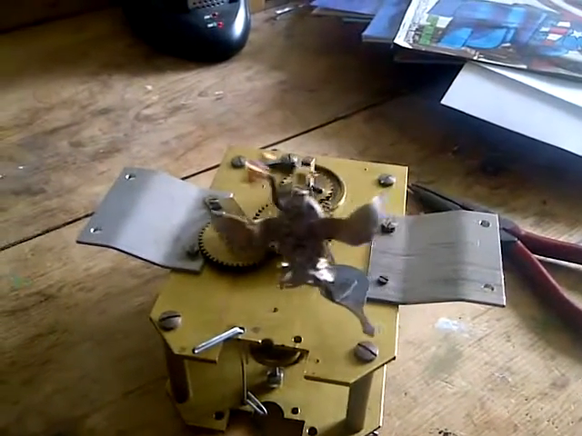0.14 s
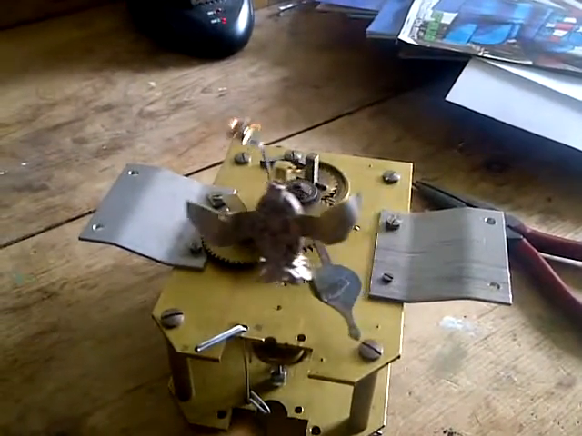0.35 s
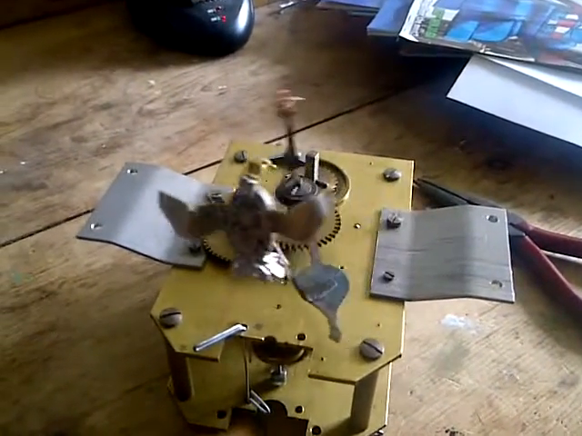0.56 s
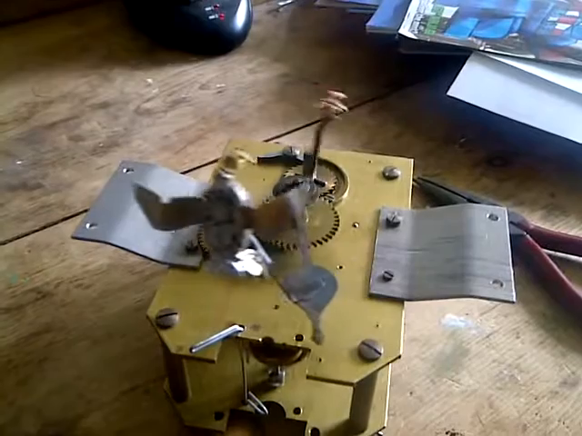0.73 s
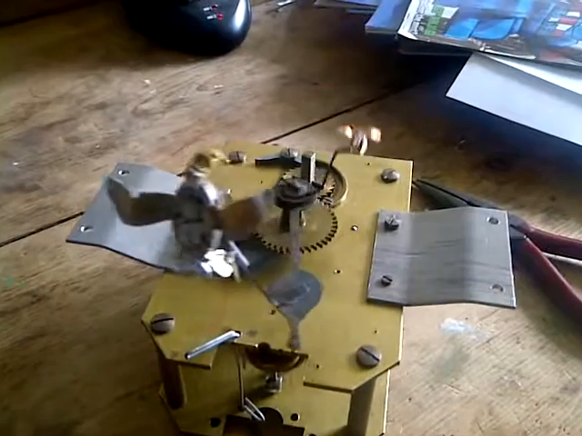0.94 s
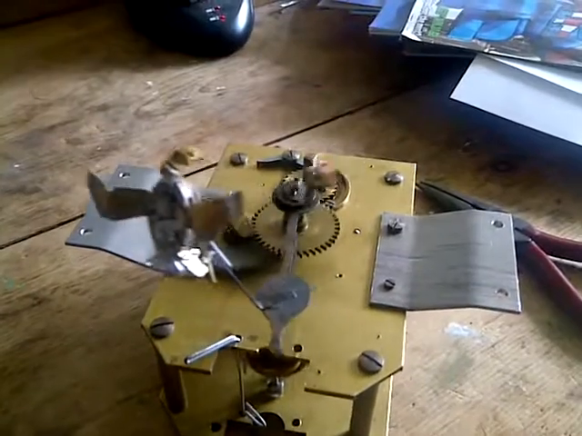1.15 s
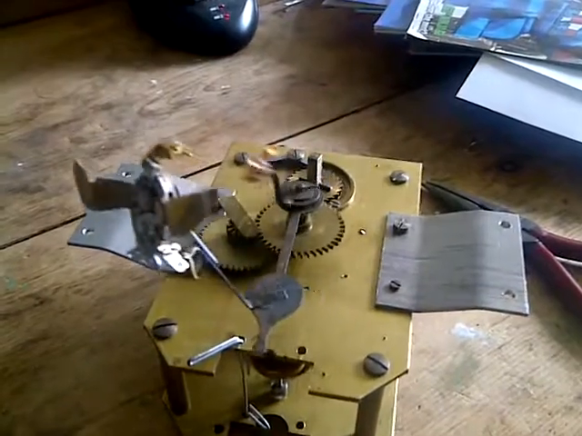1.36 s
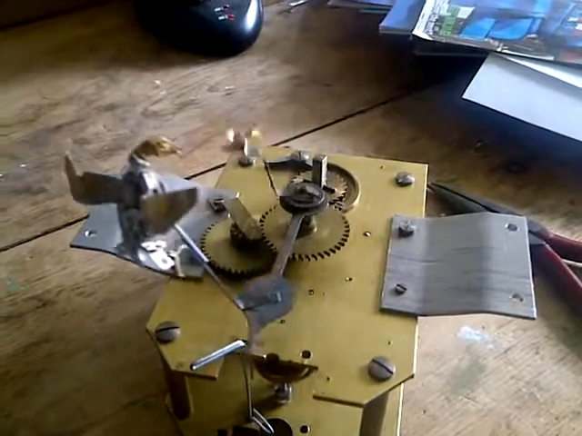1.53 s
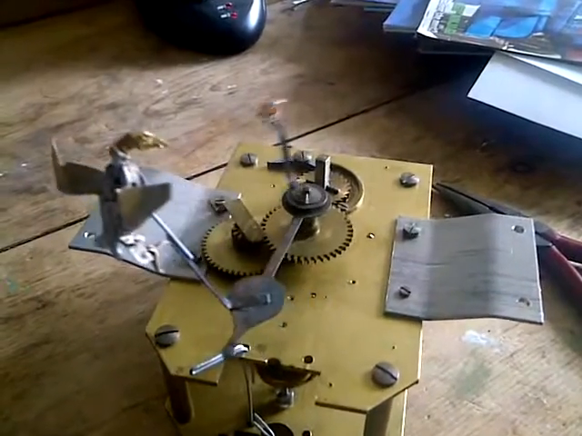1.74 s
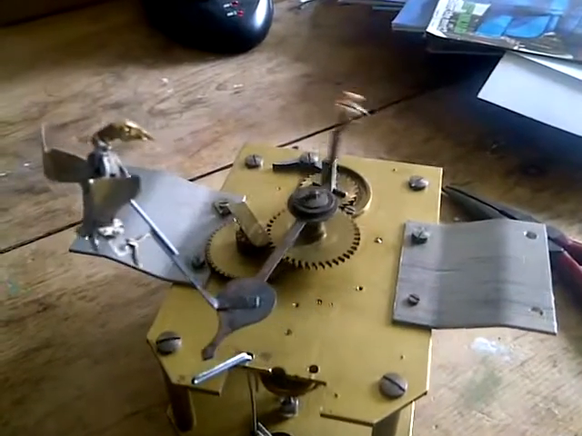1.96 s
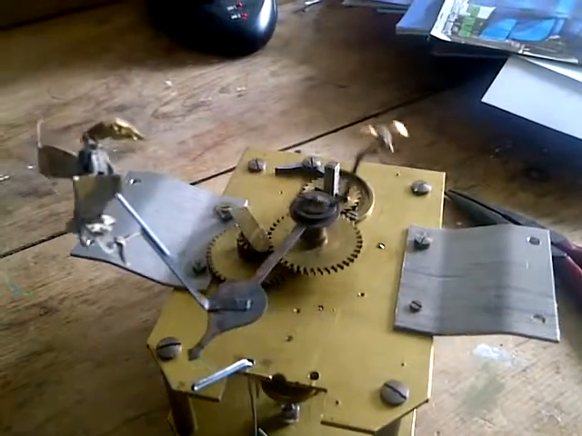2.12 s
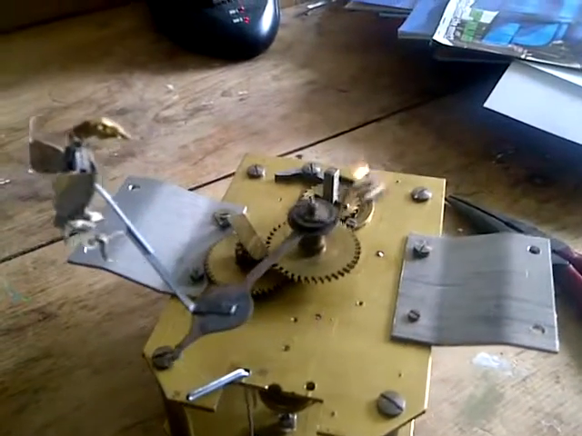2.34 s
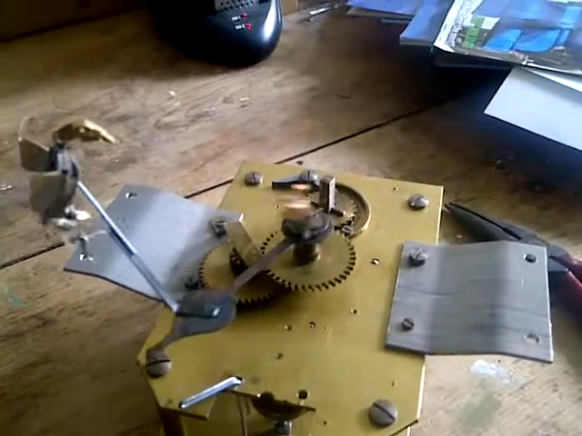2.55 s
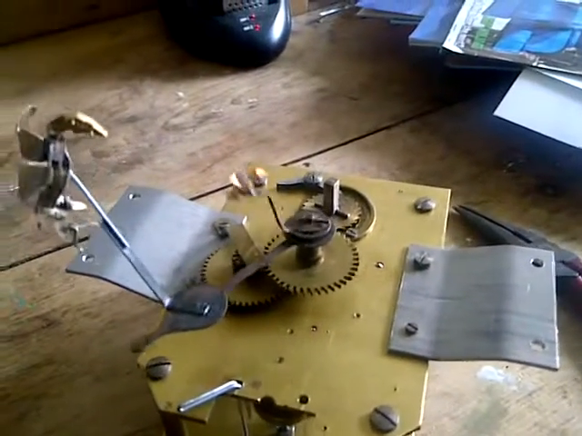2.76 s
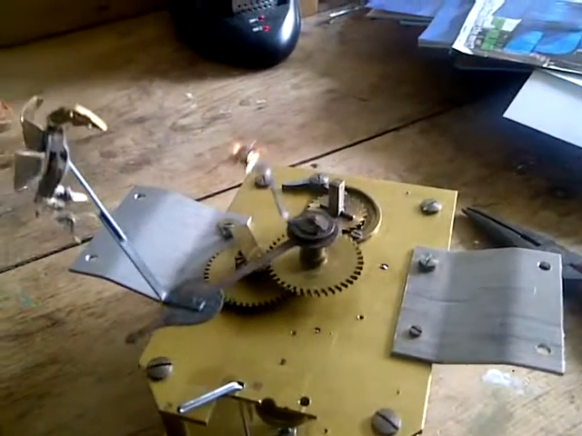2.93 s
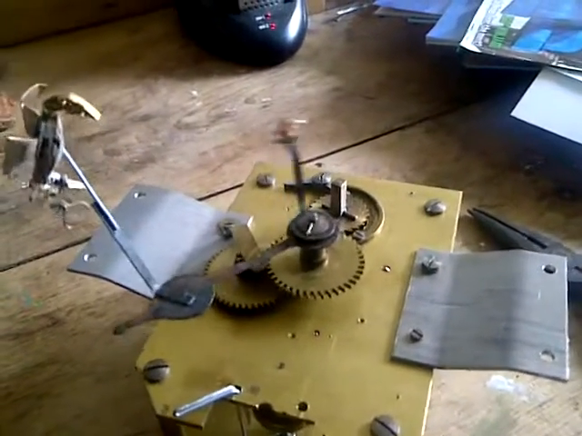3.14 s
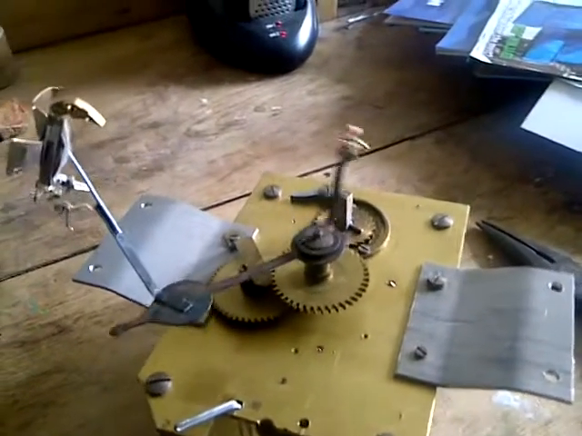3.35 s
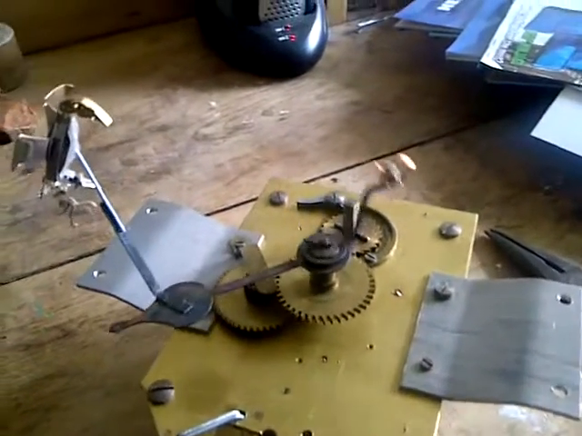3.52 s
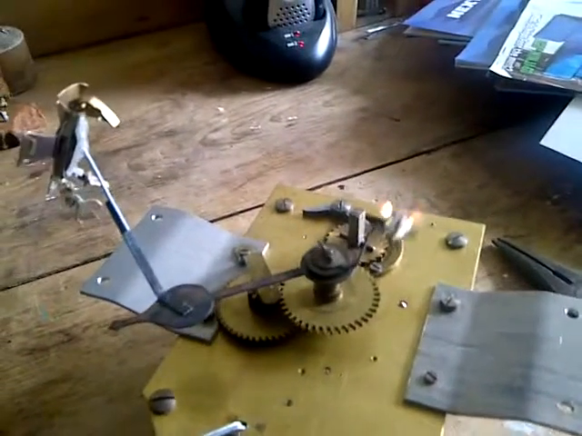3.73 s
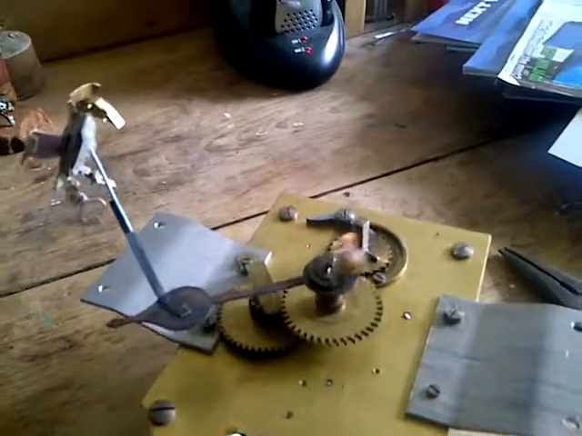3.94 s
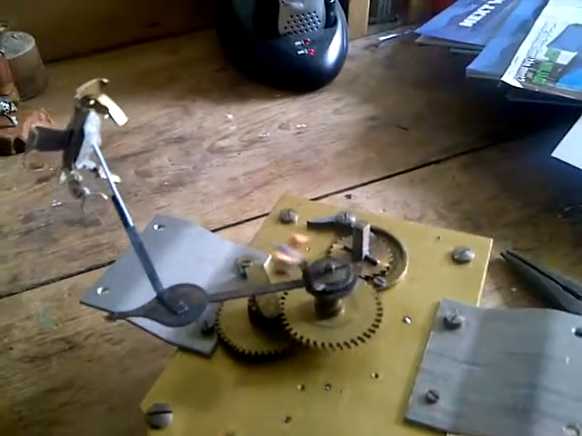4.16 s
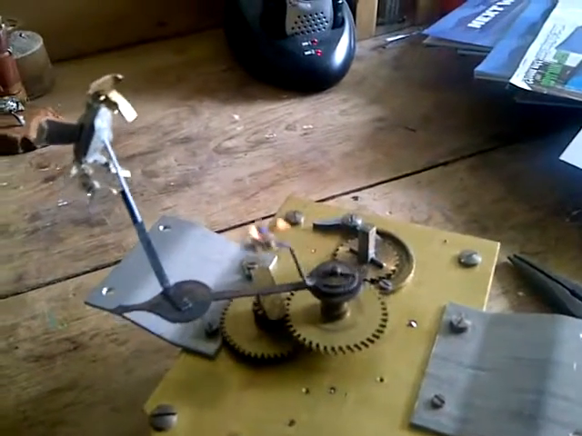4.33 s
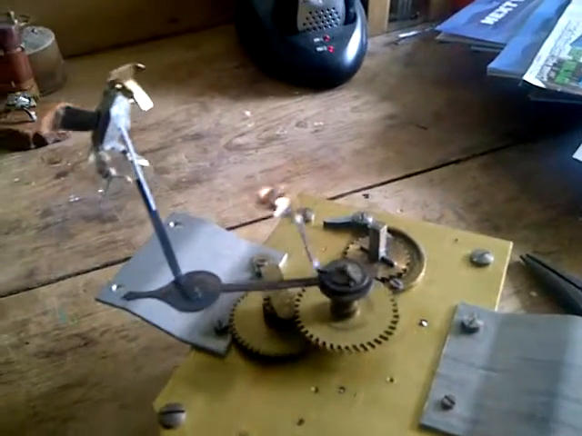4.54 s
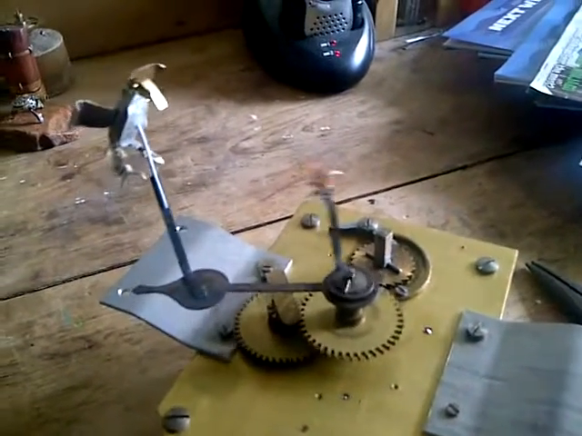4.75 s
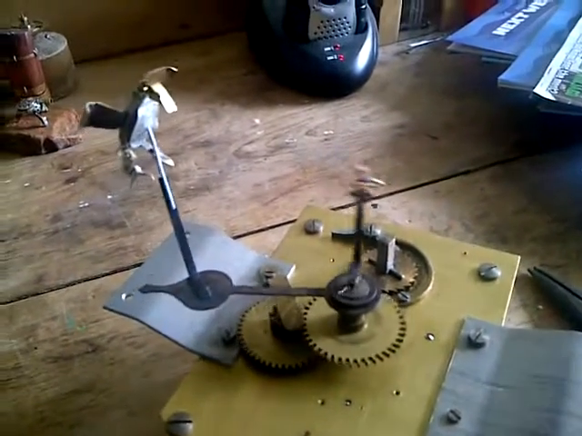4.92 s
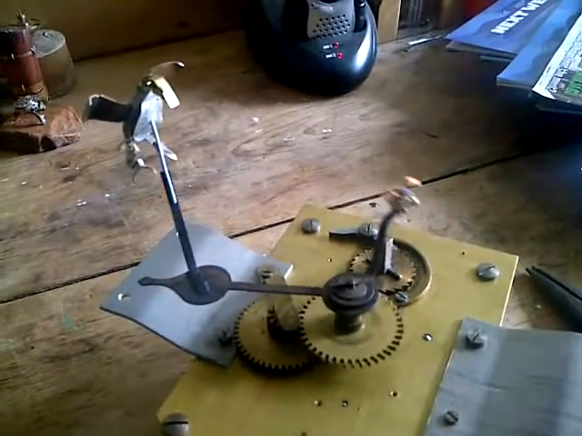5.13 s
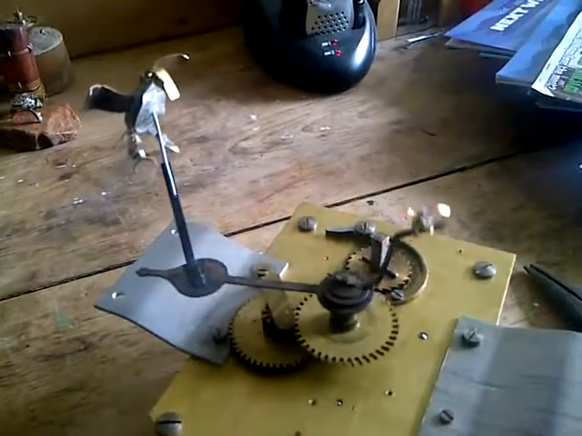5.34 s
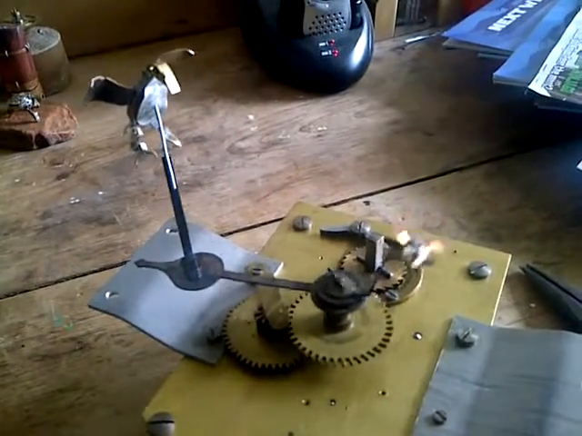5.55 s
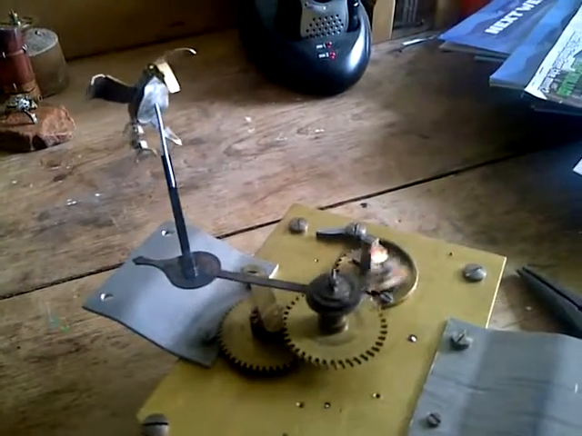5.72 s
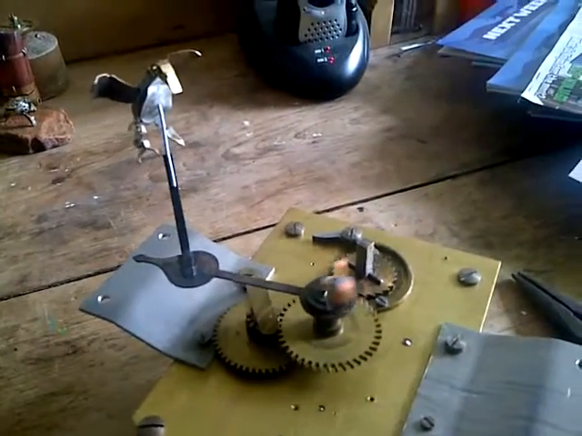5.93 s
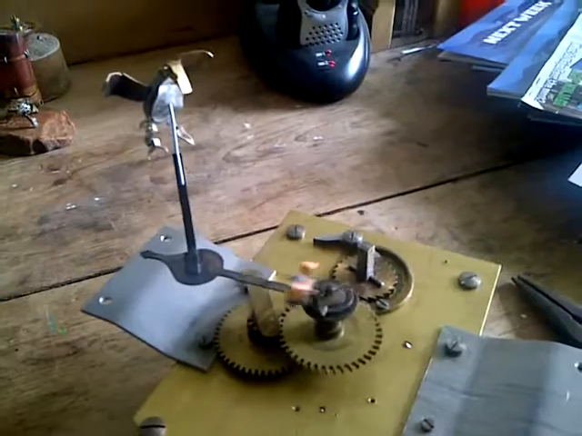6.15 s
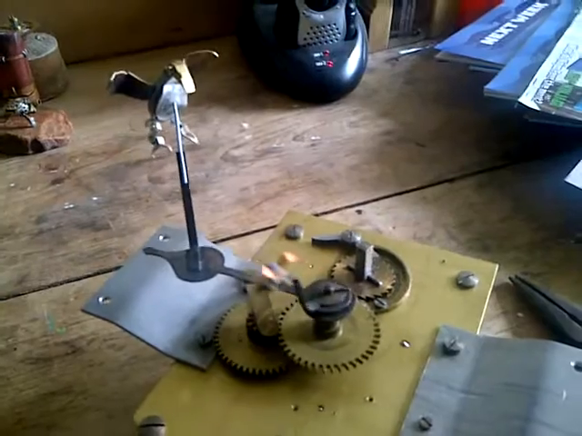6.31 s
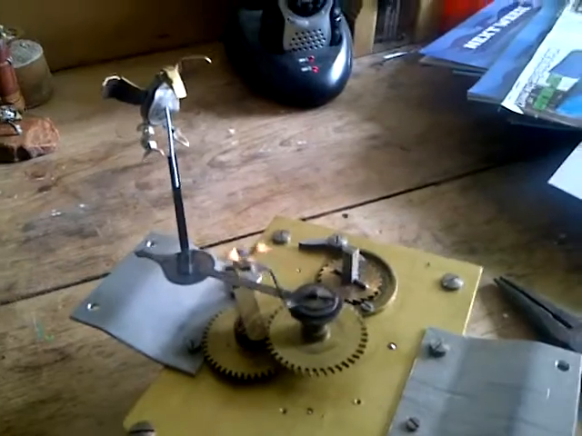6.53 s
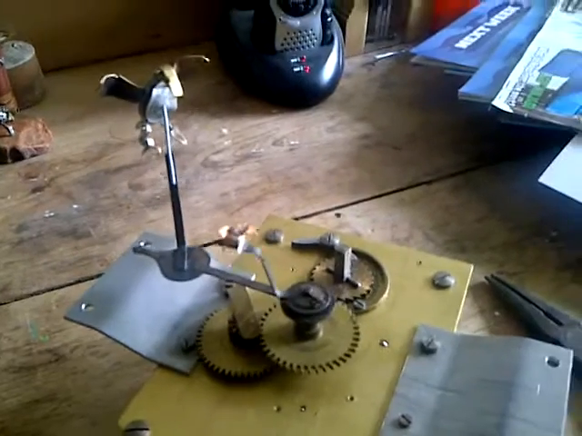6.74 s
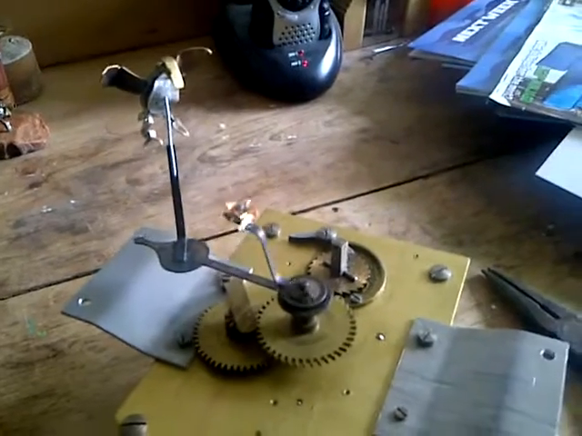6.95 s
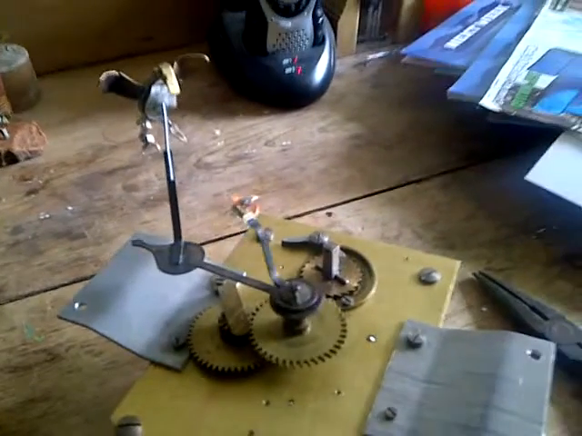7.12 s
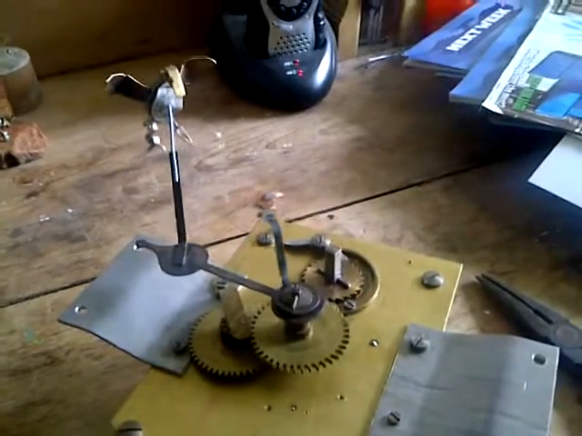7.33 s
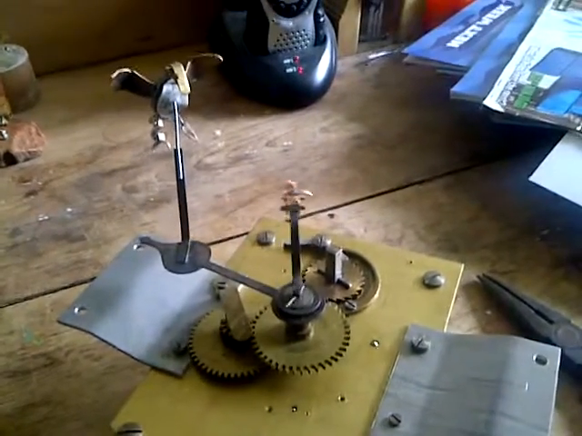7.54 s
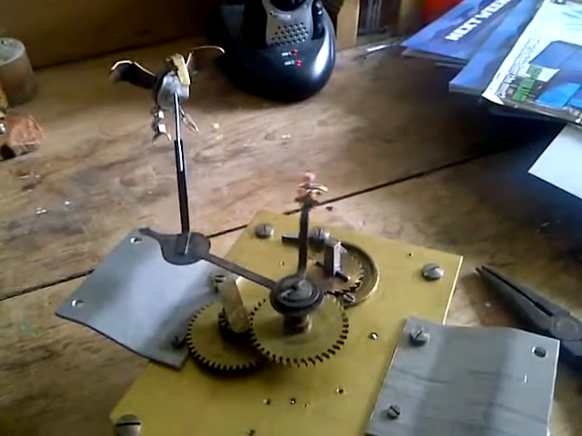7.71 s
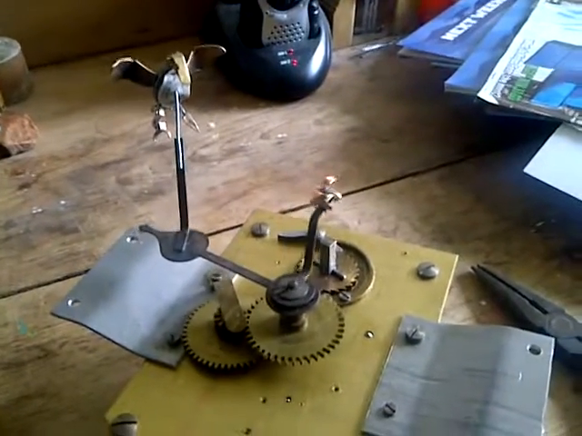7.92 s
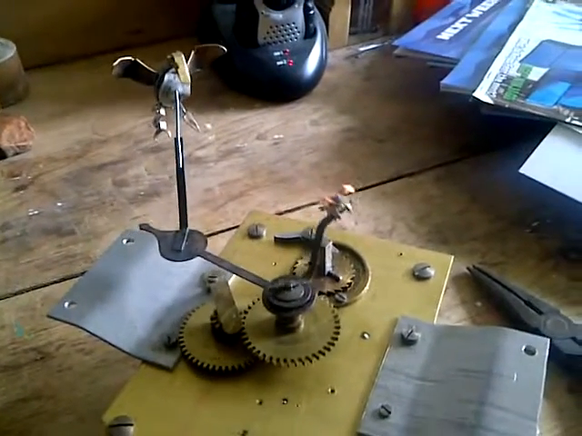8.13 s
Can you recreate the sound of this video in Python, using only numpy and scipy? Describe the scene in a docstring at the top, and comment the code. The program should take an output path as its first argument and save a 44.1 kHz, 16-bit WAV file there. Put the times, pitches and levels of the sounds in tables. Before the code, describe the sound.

A spring-driven brass clock movement runs down on a wooden bench, close to the microphone in a small, quiet room. It begins as a fast, bright whir with a tinny rattle and brief low boom. A loose arm chatters and knocks irregularly while a slack wheel pings. Gradually the rattling thins, the pitch of the whir sinks, and it opens into a quieter ratcheting buzz still running at the end.

```python
"""A spring-driven brass clock movement runs down on a wooden bench, close to the microphone in a small room.
It starts as a whir, with a tin bird rattling brightly on a loose wire arm and a brief boom of the bench top.
Tooth blows drive the scrape, pinion and frame; the arm chatters and knocks, and a slack wheel pings.
Midway a soft rasp swells and fades, with two faint bumps of handling in the middle of it.
As the fastest arbor slows from about 52 to 14 turns a second, the whir opens into a ratcheting buzz."""
import sys
import numpy as np
from scipy import signal
from scipy.fft import rfft, irfft, next_fast_len
from scipy.io import wavfile
from scipy.ndimage import uniform_filter1d, map_coordinates

SR = 44100
rng = np.random.default_rng(int(sys.argv[2]) if len(sys.argv) > 2 else 0)


def to_wav(sig):
    """Store sig (one row per channel, or 1-D mono) as 16-bit WAV at the path in sys.argv[1].

    Samples outside -1..1 are clipped; the rate is SR.
    """
    pcm = np.clip(np.atleast_2d(sig), -1, 1) * 32767
    pcm = np.round(pcm).astype(np.int16)
    wavfile.write(sys.argv[1], SR, pcm.T)  # frames by channels


N = 365148

# spectrum of the room tone: (frequency [Hz], relative density [dB per Hz])
ROOM_TONE_SPECTRUM = [(20, -9.5), (50, -8), (100, 1.5), (160, 2.5), (300, -8), (1000, -1), (8000, -21)]
# decay of the bench top and near walls: (frequency [Hz], 60 dB decay time [s])
ROOM_DECAY = [(200, 0.029), (2000, 0.14), (8000, 0.061)]
# soft bumps of handling: (time [s], peak level [dB])
HANDLING_BUMPS = [(4.149, -53), (4.236, -62)]
# resonances that color the bumps: (frequency [Hz], width [Hz], relative level [dB])
BUMP_MODES = [(69.4, 83, -7), (142, 94, -3)]
# drag of the turning parts, one soft rub: (start [s], length [s], peak level [dB])
SOFT_RUB = (2.94, 2.23, -60)
# resonances that color the rub: (frequency [Hz], width [Hz], relative level [dB])
RUB_MODES = [(1790, 220, -1.3), (1900, 260, -0.7)]
# speed of the fastest arbor: (time [s], speed [turns/s])
ARBOR_SPEED = [(0, 52.5), (.8, 50), (2, 45.5), (3.5, 39.3), (5, 30.5), (5.6, 26.3), (6.5, 20.8), (7, 17.5),
               (7.3, 16.1), (7.6, 15.2), (8.28, 14.35)]
# clear pings of the slack wheel: (time [s], peak level [dB])
WHEEL_PINGS = [(.108, -36), (.145, -40.5), (.386, -38), (.589, -38), (.626, -42), (.697, -43), (1.138, -46),
               (1.161, -47), (1.203, -39.5), (1.561, -39.5), (1.584, -41), (1.798, -39), (2.102, -40),
               (2.167, -38.5), (2.284, -40), (2.317, -39), (2.418, -40), (2.497, -39), (2.624, -33.5),
               (2.656, -47), (2.682, -36), (2.764, -41), (2.783, -46), (3.001, -40), (3.169, -43),
               (3.481, -38), (3.633, -40), (3.658, -39), (3.739, -52), (3.955, -38), (3.979, -40),
               (4.065, -40), (4.170, -39.5), (4.273, -39), (4.286, -43), (4.294, -45), (4.435, -39.5),
               (4.476, -40), (4.524, -41), (4.721, -54), (4.737, -39), (4.770, -43), (4.936, -43),
               (4.964, -44.5), (5.026, -41), (5.057, -42), (5.445, -43), (5.466, -48), (5.739, -45),
               (5.781, -45), (5.893, -43), (6.057, -43), (6.187, -45), (6.416, -46), (6.854, -50),
               (7.177, -46), (7.230, -51)]
# hard knocks of the arm: (time [s], peak level [dB])
ARM_KNOCKS = [(.036, -49), (.457, -32), (.505, -30.5), (.626, -29), (.688, -33), (.928, -33.5), (.988, -34),
              (1.042, -32), (1.162, -30), (1.196, -30.5), (1.604, -33), (1.799, -28.5), (1.985, -28.5),
              (1.993, -29.5), (2.292, -36), (2.315, -35), (2.328, -34), (2.488, -42), (2.659, -32),
              (2.697, -30), (3.005, -36), (3.146, -40), (3.210, -42), (3.381, -33), (3.431, -36),
              (3.737, -33), (3.778, -30.5), (3.829, -42), (4.039, -43), (4.065, -45), (4.264, -38),
              (4.273, -40), (4.289, -37), (4.498, -37), (4.523, -33), (4.709, -29), (4.719, -38),
              (4.737, -34), (4.859, -49), (4.913, -43), (5.026, -39), (5.095, -38), (5.197, -38.5),
              (5.367, -37), (5.438, -36), (5.454, -36), (5.466, -35), (5.651, -47), (5.739, -39),
              (5.775, -38), (5.893, -40), (6.102, -43), (6.366, -41), (6.395, -40), (6.753, -40),
              (6.854, -39), (6.963, -42), (7.018, -46), (7.193, -41), (7.252, -44), (7.439, -42),
              (7.551, -47), (7.617, -42), (7.674, -41), (8.019, -41), (8.217, -41)]
# bouts in which the loose parts shake harder: (start [s], length [s], rise [dB])
CHATTER_BOUTS = [(0.052, 0.12, 3.5), (0.432, 0.04, 0.5), (0.544, 0.095, 1), (0.671, 0.032, 6.5),
                 (0.92, 0.15, 2), (1.086, 0.1, 4), (1.247, 0.2, 2.5), (1.54, 0.12, 2), (1.91, 0.11, 3),
                 (2.27, 0.08, 5.5), (2.584, 0.14, 5), (2.746, 0.057, 8.5), (2.902, 0.13, 4),
                 (3.16, 0.089, 2), (3.353, 0.047, 6.5), (3.597, 0.1, 3), (3.727, 0.047, 9.5),
                 (3.794, 0.07, 9), (3.913, 0.1, 4), (4.018, 0.081, 6.5), (4.253, 0.058, 8),
                 (4.45, 0.15, 5.5), (4.696, 0.095, 1.5), (4.96, 0.11, 3), (5.44, 0.042, 7), (5.67, 0.2, 4),
                 (5.86, 0.045, 0), (6.31, 0.1, 4.5), (7.116, 0.2, 4.5), (7.565, 0.18, 2.5)]
# lulls in which they settle: (start [s], length [s], depth [dB])
CHATTER_LULLS = [(0.756, 0.037, 7), (1.255, 0.033, 6), (1.498, 0.061, 5), (1.724, 0.036, 7.5),
                 (2.47, 0.19, 4), (3.376, 0.088, 4.5), (5.245, 0.071, 7), (5.4, 0.053, 2),
                 (7.797, 0.29, 4.5)]
# rattle of the tin bird before bouts and lulls: (time [s], level [dB])
TIN_RATTLE = [(0, -53.5), (0.65, -54), (0.9, -63), (2, -83)]
# loose parts before trims, bouts and lulls: (time [s], arm chatter [dB], wheel ring [dB])
LOOSE_LEVELS = [(0, -45.5, -54.5), (0.85, -48, -52.5), (2.1, -44.5, -54.5), (2.7, -49, -50.5),
                (3.1, -48, -53), (4.1, -55, -57), (4.9, -54.5, -59), (5.55, -65, -63), (6.4, -60.5, -62.5),
                (7.65, -67.5, -62), (8.28, -63, -63.5)]
# how the arm goes from bouncing to riding on the teeth: (speed [turns/s], share of bouncing [0 to 1])
BOUNCE_SHARE = [(16.8, .08), (19, .6), (27, .72), (33, .92)]
# resonances of slack wheel, wire arm and tin bird: (frequency [Hz], width [Hz], relative level [dB])
WHEEL_MODES = [(2138, 42, -3.5), (2186, 50, 0), (2248, 62, -3), (2320, 90, -13), (2392, 35, -11)]
ARM_MODES = [(3980, 280, -6.5), (4130, 140, -3.5), (4198, 90, 0), (4300, 150, -1.5), (4420, 170, -4),
             (4530, 170, -8), (5700, 500, -20)]
TIN_MODES = [(2670, 140, -3), (4770, 320, -5.5), (5200, 330, -3.5), (5500, 360, -2), (5960, 320, -3.5),
             (6020, 91, -2.5)]
# force of the train before trims and load: (time [s], frame hum [dB], pinion ring [dB], tooth scrape [dB])
TRAIN_LEVELS = [(0.05, -51.5, -49.5, -50.5), (0.09, -53, -51.5, -53), (0.59, -51.5, -49.5, -51.5),
                (0.75, -53.5, -52, -52.5), (2.16, -54, -51, -52), (4.54, -58, -54, -58.5),
                (6.99, -62, -54.5, -61.5), (7.24, -62, -53, -59.5), (7.52, -63, -54.5, -60.5),
                (7.61, -60, -52, -59), (7.97, -63.5, -60, -59.5), (8.2, -59, -55, -59)]
# resonances of frame and pinion, fast and slow: (frequency [Hz], width [Hz], relative level [dB])
FRAME_FAST_MODES = [(233.5, 11, 7), (290.7, 56, 1.5), (361, 23, -0.5), (407, 69, -5.5), (567, 110, -6),
                    (691, 81, -1.5), (852, 150, -3), (1091, 35, 2.5), (1112, 160, -0.5), (1268, 44, -9),
                    (1446, 54, -8), (1683, 47, -6.5), (1650, 160, -6), (2397, 47, -3.5), (2615, 110, -4)]
FRAME_SLOW_MODES = [(229.7, 37, -2), (290, 83, -2), (360, 110, -3.5), (433, 160, -7.5), (577, 93, -2.5),
                    (692, 80, -1), (881, 130, -2.5), (1066, 52, 1.5), (1100, 110, -1.5), (1257, 56, -1),
                    (1449, 93, -3.5), (1665, 110, -3.5), (1822, 250, -3)]
PINION_FAST_MODES = [(3140, 75, -3), (3205, 70, 0), (3320, 110, -4.5), (3475, 36, -2.5), (3550, 45, -.5),
                     (3770, 120, -5)]
PINION_SLOW_MODES = [(3100, 150, -8), (3245, 60, -4), (3335, 52, 1), (3465, 48, 2), (3545, 42, 2),
                     (3625, 45, -2), (3785, 80, -1), (3875, 60, -6), (4110, 130, -3), (4560, 150, -5)]
# spectrum of the tooth scrape, fast and slow: (frequency [Hz], relative density [dB per Hz])
SCRAPE_FAST_SPECTRUM = [(300, -24), (1500, -14.5), (2600, -4.5), (2780, -5), (2960, -8.5), (3150, -5.5),
                        (4400, -1.5), (4750, -6.5), (5050, 0), (5400, -7), (6150, -4), (6550, -9.5),
                        (7450, -13.5), (8000, -25), (8500, -31), (8950, -44)]
SCRAPE_SLOW_SPECTRUM = [(300, -15.5), (1500, -1.5), (2750, -1), (3600, 5.5), (4400, 5), (5150, 4),
                        (5500, -1), (6250, -5), (6450, 5), (6650, 5), (6850, -4), (7200, -5), (8000, -14),
                        (8500, -33), (8950, -47)]

LEAVES = 8  # pinion leaves, so tooth blows in a turn
TOP_HZ = 9020  # nothing passes the microphone chain above this
ROOM_DB = -8  # echoes relative to the movement
BOOM_HZ, BOOM_WIDTH_HZ, BOOM_DB = 229.4, 11, -58  # boom of the bench top
BOOM_RATE, BOOM_RANGE = 51.2, 0.72  # speed that excites it most, and the range around it (turns/s)
FLUTTER_PER_S, FLUTTER_DB = 36, 1.5  # knots a second and scale of the chance swells of the rattle
LOAD_SCRAPE, LOAD_PINION, LOAD_HUM, LOAD_WHEEL = 0.64, 0.34, 0.4, 0.47  # dB per dB of shaking
HUM_DB, PINION_DB, SCRAPE_DB, ARM_DB, WHEEL_DB = 1.4, -0.5, 3, -0.5, -0.26  # trims added to the level tables
SWING_DB, FOLLOW_RATE = 1, 33  # once-a-turn swing at rest; it fades out around this speed (turns/s)
REBOUNDS_PER_S, MOST_PER_TURN = 95, 4  # the arm's own rebound rate, and its most landings in a turn
STRAYS_PER_S, STRAY_DB = 118, -2.5  # lighter bounces between the landings
FLICK_LAG = .52  # point of the turn at which the wheel is flicked (turns)
KNOCK_TIN_DB = -18  # gain of the tin's answer to a hard knock


def amp(db):
    """Decibels to gain."""
    return 10 ** (np.asarray(db) / 20)


def unit(x):
    """Scale to rms 1."""
    return x / np.sqrt(np.mean(x ** 2) + 1e-20)


def even(x, size=4000):
    """Scale to a running rms of about 1, keeping the fast grain."""
    power = uniform_filter1d(uniform_filter1d(x ** 2, size), size // 2)
    return x / np.sqrt(np.abs(power) + 1e-20)


def along(points, hz):
    """Interpolate (frequency [Hz], value) points on a log axis."""
    f, v = np.transpose(points)
    return np.interp(np.log(hz + 1), np.log(f + 1), v)


def curves(rows):
    """One value per sample for each column after the time."""
    s, *cols = np.transpose(rows)
    return [np.interp(np.arange(N) / SR, s, c) for c in cols]


def causal(x, gain, size=8192):
    """x through the minimum-phase filter with the given gain of frequency."""
    cepstrum = irfft(np.log(gain(np.fft.rfftfreq(size, 1 / SR)) + 1e-6))
    # fold the cepstrum onto positive time, so nothing sounds before its cause
    cepstrum[1:size // 2] *= 2
    cepstrum[size // 2 + 1:] = 0
    response = irfft(np.exp(rfft(cepstrum)))
    return signal.oaconvolve(x, response)[:len(x)]


def coloured(x, spectrum):
    """x through a smooth spectrum."""
    return causal(x, lambda hz: amp(along(spectrum, hz)))


def ringing(x, modes):
    """x through a set of steep-sided resonances, summed by power."""
    def gain(hz):
        return np.sqrt(sum((amp(db) / (1 + 2 * ((hz - c) / w) ** 2)) ** 2 for c, w, db in modes))
    return causal(x, gain)


def swell(start, length):
    """A smooth rise from 0 to 1 and back."""
    return np.sin(np.pi * np.clip((np.arange(N) / SR - start) / length, 0, 1)) ** 2


def wobble(rate):
    """A smooth random curve, rate knots a second."""
    return map_coordinates(rng.standard_normal(N // 100), [np.arange(N) * rate / SR])


def by_speed(fast, slow, speed, fast_rate, slow_rate):
    """Blend two sounds at equal power as the train slows."""
    share = np.clip((speed - slow_rate) / (fast_rate - slow_rate), 0, 1)
    return np.sqrt(share) * even(fast) + np.sqrt(1 - share) * even(slow)


def lopsided(speed, once_db, twice_db=0, lag=0):
    """An arbor out of true presses harder once and twice a turn; lag is in turns."""
    angle = 2 * np.pi * (np.cumsum(speed) / SR - lag)
    return amp(once_db * np.cos(angle) + twice_db * np.cos(2 * angle))


def contacts(rate, scatter, spread_db, lag=0):
    """Impulses at a rate per second, lagging and scattered by a share of their period, uneven in size."""
    passed = np.cumsum(rate) / SR
    chance = rng.standard_normal((int(passed[-1]), 2))
    place = np.arange(len(chance)) + lag + scatter * chance[:, 0]
    at = np.interp(place, passed, np.arange(N), left=0, right=0).astype(int)
    size = amp(spread_db * np.clip(chance[:, 1], -2, 2))
    return np.bincount(at, size * (at > 0), N)


def grit(blows, slide, crack=0):
    """Each blow is a tick with the share crack of its energy, and micro-contacts that die in slide seconds."""
    u = np.arange(SR // 20) / SR / slide
    pressure = u ** .25 * np.maximum(1 - u, 0)
    noise, share = rng.standard_normal(N), np.clip(crack, 0, 1)
    drag = signal.oaconvolve(blows, pressure / np.linalg.norm(pressure))[:N] * noise
    tick = blows * np.sign(noise)
    return even(np.sqrt(share) * tick + np.sqrt(1 - share) * drag)


def strikes(rows, sound, life, crack=0, size=4096):
    """A first hard contact and a burst of life seconds for each (time, peak level) row, shaped by sound."""
    out, t = np.zeros(N + size), np.arange(size) / SR
    for s, db in rows:
        burst = rng.standard_normal(size) * np.exp(-t / life)
        hit = sound(crack * (t == 0) + burst)
        out[round(s * SR):][:size] += amp(db) * hit / np.abs(hit).max()
    return out[:N]


def room_tone():
    """Faint steady noise of the room, mostly low."""
    return amp(-69.0) * unit(coloured(rng.standard_normal(N), ROOM_TONE_SPECTRUM))


def room(x, count=40):
    """Bench top and near walls answer with diffuse echoes; each stretch of sound draws a new random tail."""
    hz, t, z = signal.stft(rng.standard_normal((count, SR // 4)), SR, nperseg=256)
    decay = amp(-60 * t / along(ROOM_DECAY, hz)[:, None])
    tails = signal.istft(z * decay, SR, nperseg=256)[1]
    out, step = np.zeros(N + SR), N // count + 1
    for k, tail in enumerate(tails):
        echo = signal.fftconvolve(x[k * step:(k + 1) * step], tail / np.linalg.norm(tail))
        out[k * step:][:len(echo)] += echo
    return out[:N]


def handling_bumps():
    """Soft contacts of handling: short noise bursts through two broad low resonances."""
    return strikes(HANDLING_BUMPS, lambda x: ringing(x, BUMP_MODES), life=0.014)


def bench_boom(speed):
    """Near full speed the train drives the lowest resonance of the bench top."""
    ring = even(ringing(rng.standard_normal(N), [(BOOM_HZ, BOOM_WIDTH_HZ, 0)]))
    excitation = np.exp(-((speed - BOOM_RATE) / BOOM_RANGE) ** 2)
    return amp(BOOM_DB) * excitation * ring


def rub(speed):
    """A soft rasp of dragging parts swells and fades midway, pulsing with the arbor."""
    start, length, peak_db = SOFT_RUB
    drag = rng.standard_normal(N) * lopsided(speed, once_db=-7.0, twice_db=-2.0)
    return amp(peak_db) * swell(start, length) * even(ringing(drag, RUB_MODES))


def wheel_pings():
    """Single hard contacts ring the slack wheel."""
    return strikes(WHEEL_PINGS, lambda x: ringing(x, WHEEL_MODES), life=0.0014, crack=4.4)


def arm_knocks():
    """Single hard contacts ring the arm and, more faintly, the tin bird on it."""
    def arm_and_tin(x):
        return ringing(x, ARM_MODES) + amp(KNOCK_TIN_DB) * ringing(x, TIN_MODES)
    return strikes(ARM_KNOCKS, arm_and_tin, life=0.0016, crack=5)


def shaking():
    """How far, in dB, the loose parts shake above their steady rattle: bouts, lulls and a flutter."""
    bouts = sum(rise_db * swell(s, length) for s, length, rise_db in CHATTER_BOUTS)
    lulls = sum(depth_db * swell(s, length) for s, length, depth_db in CHATTER_LULLS)
    return FLUTTER_DB * wobble(FLUTTER_PER_S) - lulls + bouts


def rebounds(speed):
    """The arm locks onto the arbor, landing a whole number of times a turn, with lighter strays between."""
    per_turn = np.minimum(np.round(REBOUNDS_PER_S / speed), MOST_PER_TURN)
    locked = contacts(per_turn * speed, scatter=.12, spread_db=1.2)
    strays = contacts(np.full(N, STRAYS_PER_S), scatter=.25, spread_db=1.5)
    return locked + amp(STRAY_DB) * strays


def chatter(speed, teeth, bounces):
    """Force in the loose joint: the arm bounces, then rides on the teeth as the train slows."""
    bouncing = np.interp(speed, *np.transpose(BOUNCE_SHARE))
    bounce = np.sqrt(bouncing) * grit(bounces, slide=.0045, crack=.6)
    ride = np.sqrt(1 - bouncing) * grit(teeth, slide=.003, crack=.5)
    return bounce + ride + .25 * rng.standard_normal(N)


def loose_parts(speed, teeth, bounces, shake_db):
    """The arm chatters and shakes the tin bird; once a turn a slack wheel is flicked and jogs the arm."""
    arm_db, wheel_db = curves(LOOSE_LEVELS)
    tin_db, = curves(TIN_RATTLE)
    flicks = contacts(speed, scatter=.04, spread_db=.8, lag=FLICK_LAG)

    # the arm cannot follow the turn at high speed
    swing = lopsided(speed, once_db=SWING_DB / (1 + (speed / FOLLOW_RATE) ** 4), lag=FLICK_LAG)
    jog = np.interp(speed, [16.5, 19, 23, 28], [.2, .8, .8, 0]) * grit(flicks, slide=.016)
    arm_ring = even(ringing(chatter(speed, teeth, bounces) + jog, ARM_MODES), size=1000)
    arm = amp(arm_db + shake_db + ARM_DB) * arm_ring * swing

    tin_ring = even(ringing(chatter(speed, teeth, bounces), TIN_MODES), size=1000)
    tin = amp(tin_db + shake_db) * tin_ring

    flick_force = np.interp(speed, [16.5, 19, 42, 48], [.5, 1.7, 1.4, .9])
    push = chatter(speed, teeth, bounces) + flick_force * grit(flicks, slide=.012, crack=.6)
    wheel_ring = even(ringing(push, WHEEL_MODES), size=2200)
    wheel = amp(wheel_db + LOAD_WHEEL * shake_db + WHEEL_DB) * wheel_ring
    return arm + tin + wheel


def gear_train(speed, teeth, bounces, shake_db):
    """Each pinion leaf strikes and slides on a tooth: it scrapes, rings the pinion and shakes the frame."""
    hum_db, pinion_db, scrape_db = curves(TRAIN_LEVELS)

    def force(hiss, jolt):
        """Tooth blows over a steady hiss of the pivots, jolted by every rebound of the arm."""
        blows = grit(teeth, slide=.0042, crack=.1)
        return blows + hiss * rng.standard_normal(N) + jolt * grit(bounces, slide=.0022, crack=.55)

    scrape_jolt = np.interp(speed, [17, 28, 38, 48], [.9, 2, 1.9, 1.5])
    scrape_fast = coloured(force(hiss=.25, jolt=scrape_jolt), SCRAPE_FAST_SPECTRUM)
    scrape_slow = coloured(force(hiss=.45, jolt=.1), SCRAPE_SLOW_SPECTRUM)
    scrape = by_speed(scrape_fast, scrape_slow, speed, fast_rate=17.3, slow_rate=16.6)

    pinion_jolt = np.interp(speed, [16.5, 19, 28], [.2, 1.1, 1.6])
    pinion_fast = ringing(force(hiss=0.49, jolt=1.3), PINION_FAST_MODES)
    pinion_slow = even(ringing(force(hiss=.3, jolt=pinion_jolt), PINION_SLOW_MODES), size=1200)
    pinion = by_speed(pinion_fast, pinion_slow, speed, fast_rate=55.6, slow_rate=19.0)

    frame_fast = ringing(force(hiss=0.4, jolt=0.2), FRAME_FAST_MODES)
    frame_slow = ringing(force(hiss=0.96, jolt=0.43), FRAME_SLOW_MODES)
    frame = by_speed(frame_fast, frame_slow, speed, fast_rate=54.3, slow_rate=22.0)

    # a bout of chatter loads the teeth, and the scrape feels it most
    return (amp(SCRAPE_DB + scrape_db + LOAD_SCRAPE * shake_db) * scrape
            + amp(PINION_DB + pinion_db + LOAD_PINION * shake_db) * pinion
            + amp(HUM_DB + hum_db + LOAD_HUM * shake_db) * frame)


def scene():
    """The movement close by on its bench, over faint room tone."""
    speed, = curves(ARBOR_SPEED)
    teeth = contacts(LEAVES * speed, scatter=0.029, spread_db=1.5) * lopsided(speed, once_db=1.7)
    bounces, shake_db = rebounds(speed), shaking()
    background = room_tone() + handling_bumps() + bench_boom(speed)
    movement = rub(speed) + wheel_pings() + arm_knocks()
    movement += loose_parts(speed, teeth, bounces, shake_db)
    movement += gear_train(speed, teeth, bounces, shake_db)
    return (background + amp(ROOM_DB) * room(movement) + movement)[None]


def record(dry):
    """The microphone chain rolls off over the last 400 Hz and keeps nothing above its band limit."""
    size = next_fast_len(N + 8192)
    passed = np.clip((TOP_HZ - np.fft.rfftfreq(size, 1 / SR)) / 400, 0, 1)
    return irfft(rfft(dry, size) * passed, size)[:, :N]


dry = scene()
out = record(dry)
to_wav(out)
```